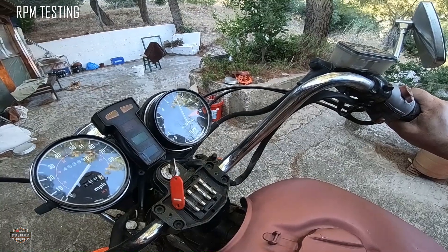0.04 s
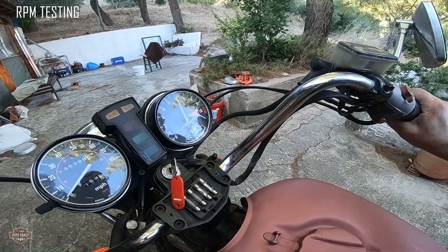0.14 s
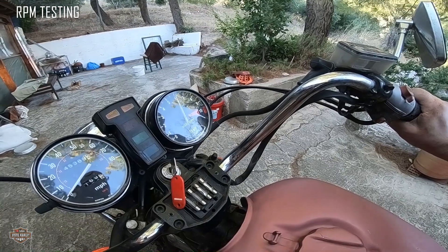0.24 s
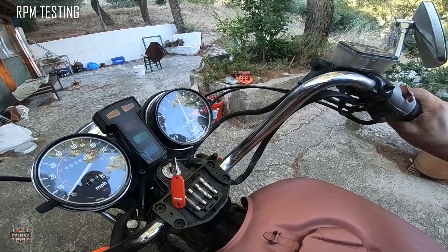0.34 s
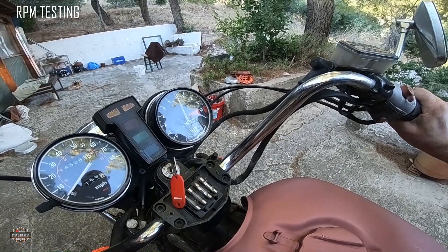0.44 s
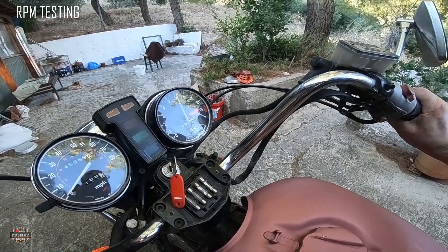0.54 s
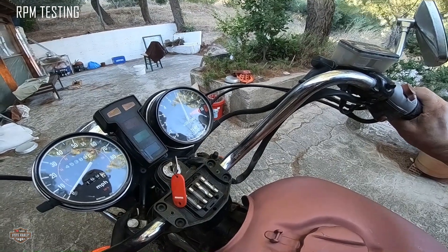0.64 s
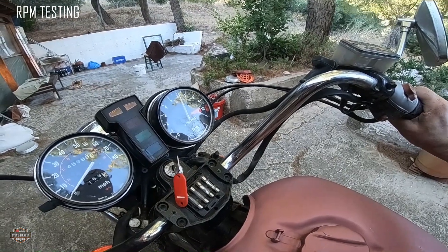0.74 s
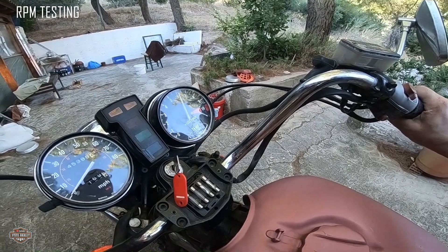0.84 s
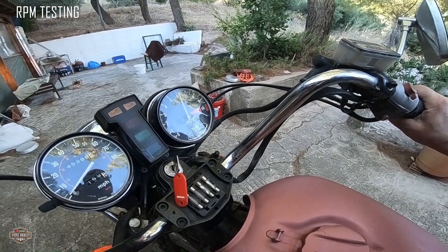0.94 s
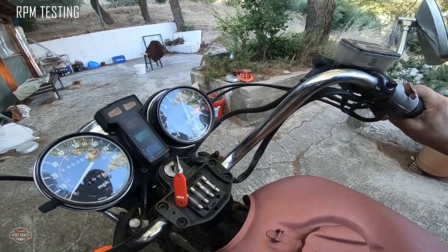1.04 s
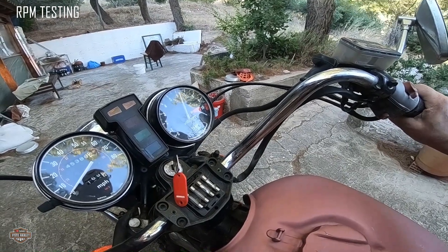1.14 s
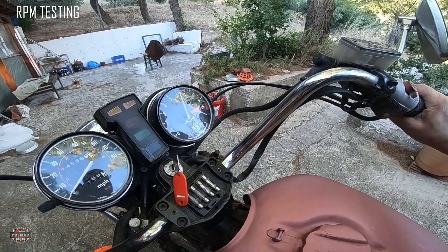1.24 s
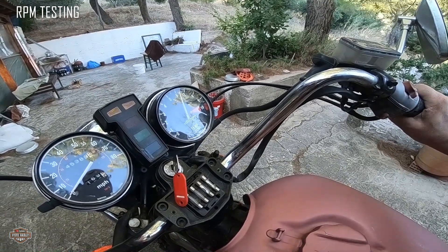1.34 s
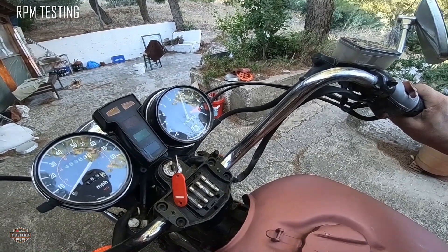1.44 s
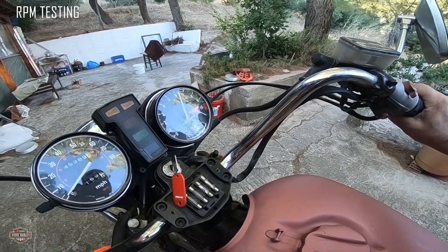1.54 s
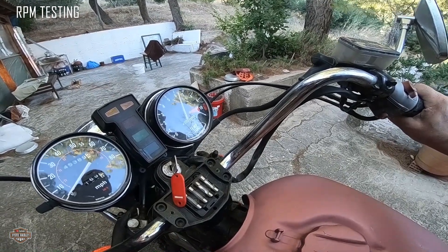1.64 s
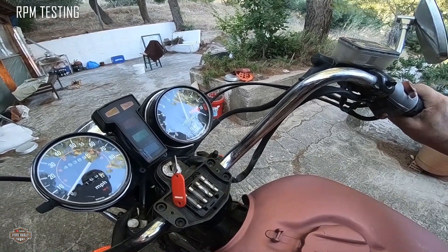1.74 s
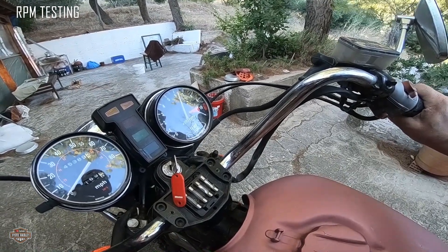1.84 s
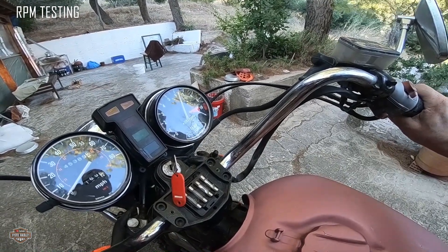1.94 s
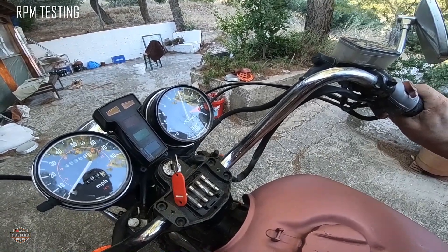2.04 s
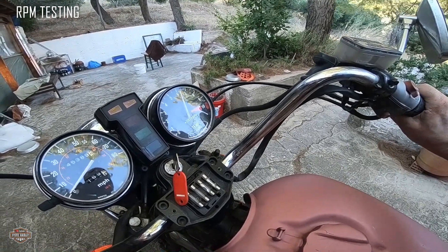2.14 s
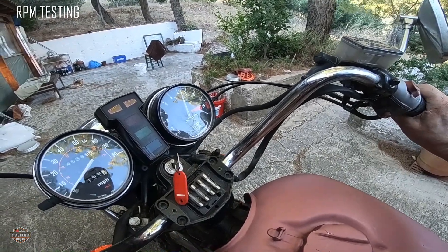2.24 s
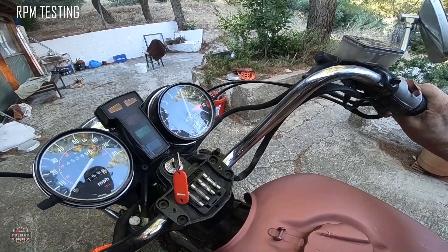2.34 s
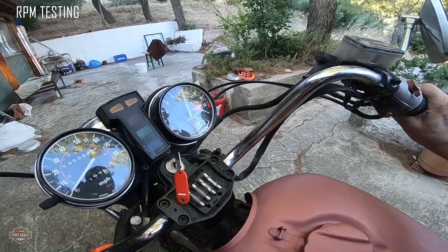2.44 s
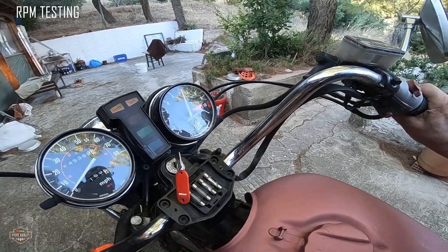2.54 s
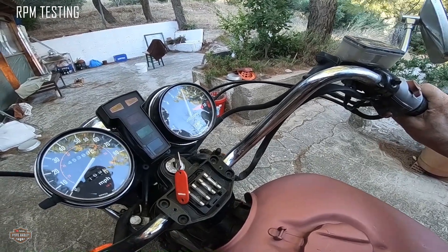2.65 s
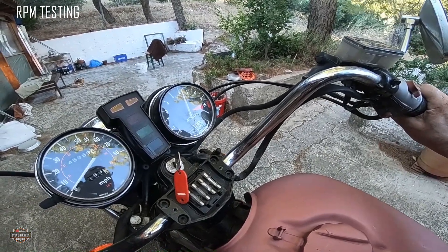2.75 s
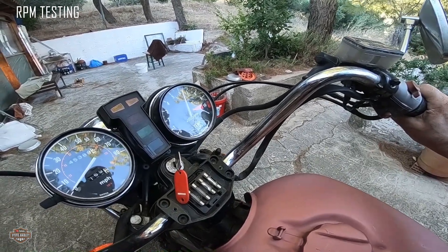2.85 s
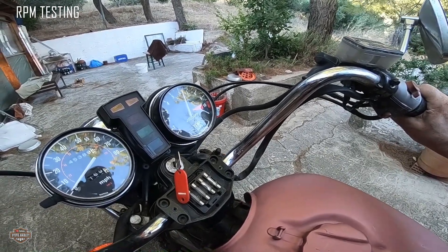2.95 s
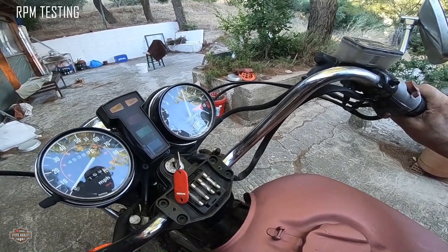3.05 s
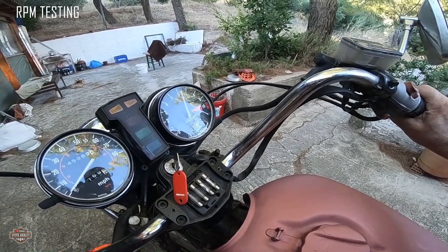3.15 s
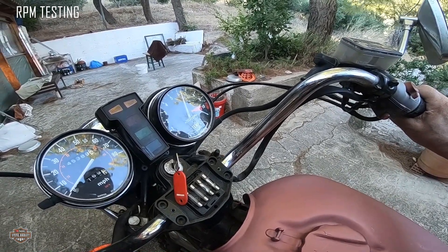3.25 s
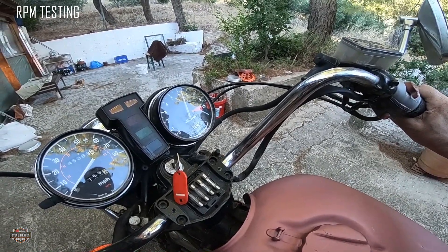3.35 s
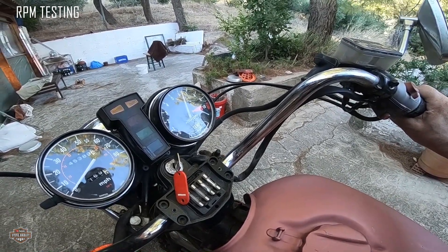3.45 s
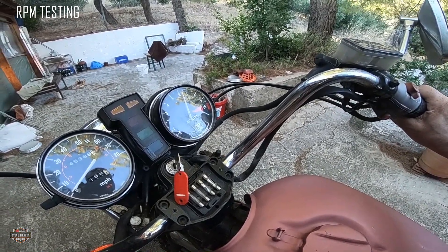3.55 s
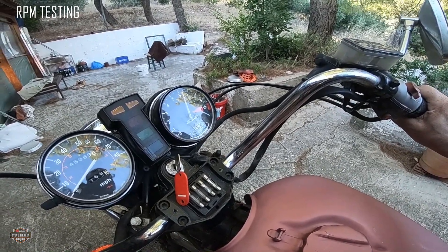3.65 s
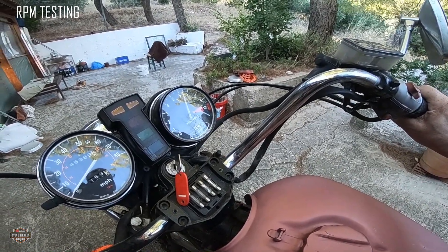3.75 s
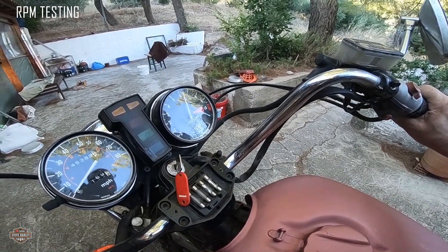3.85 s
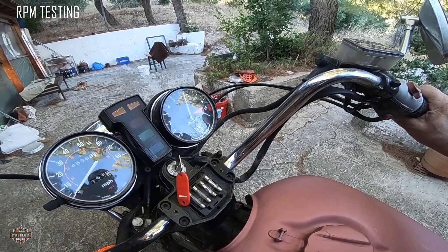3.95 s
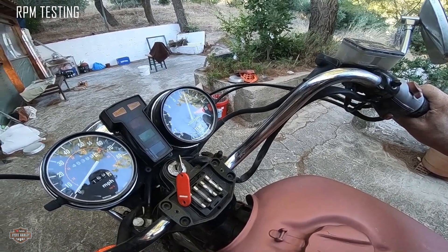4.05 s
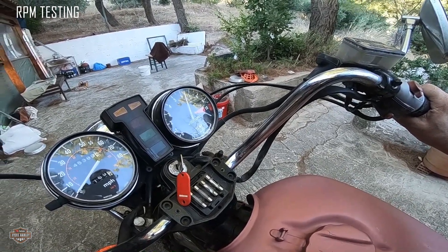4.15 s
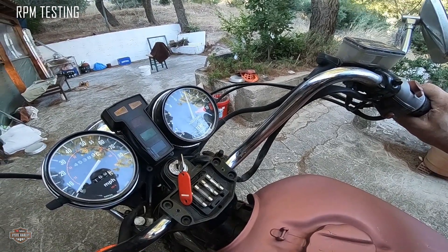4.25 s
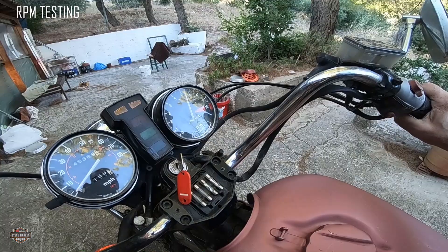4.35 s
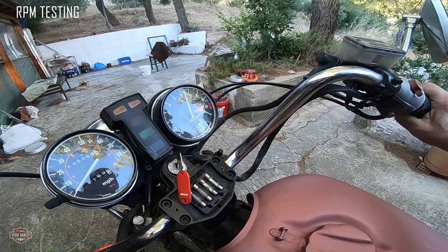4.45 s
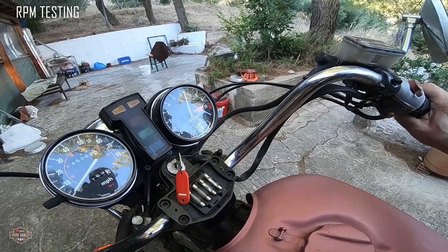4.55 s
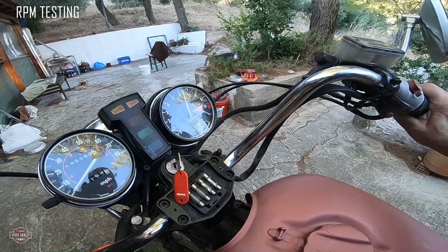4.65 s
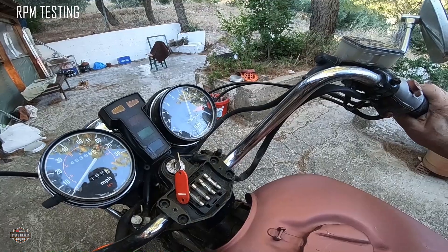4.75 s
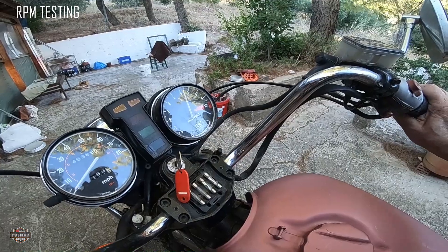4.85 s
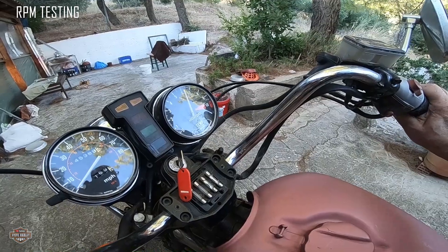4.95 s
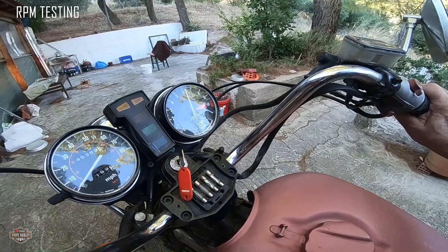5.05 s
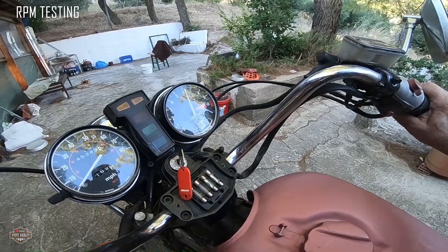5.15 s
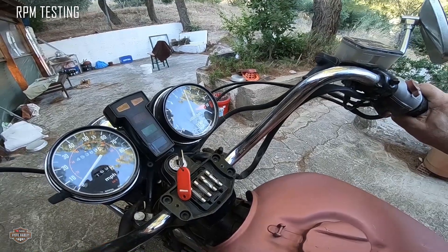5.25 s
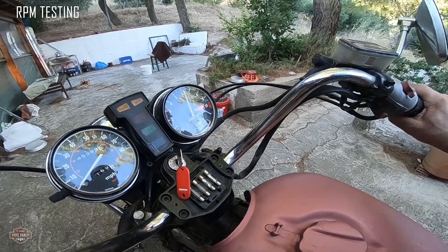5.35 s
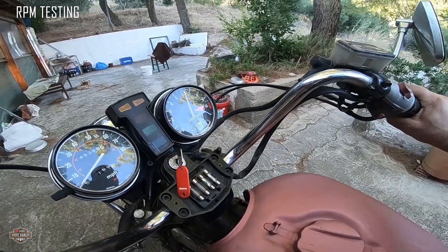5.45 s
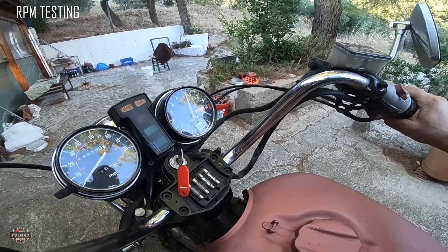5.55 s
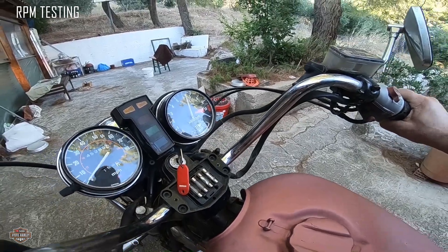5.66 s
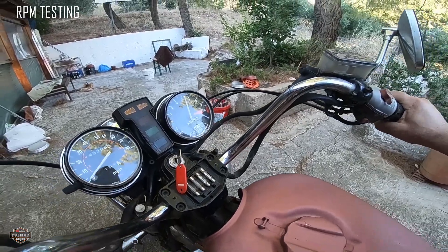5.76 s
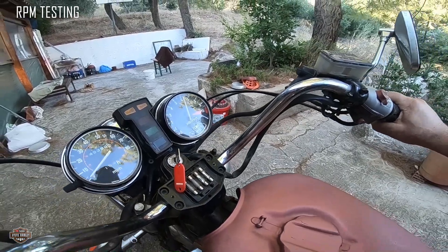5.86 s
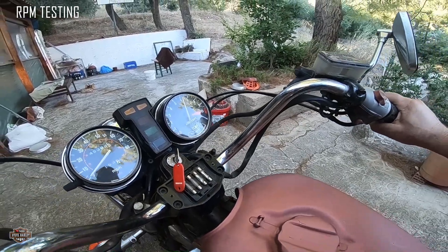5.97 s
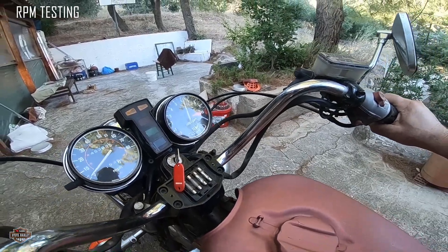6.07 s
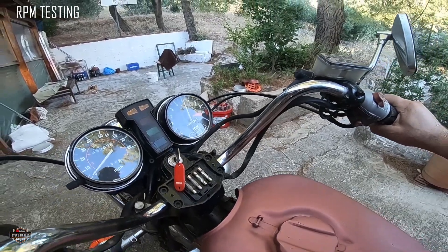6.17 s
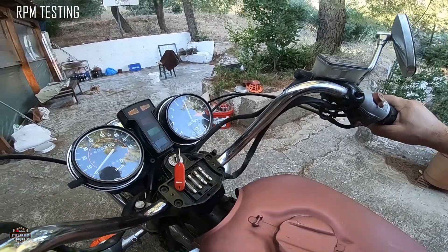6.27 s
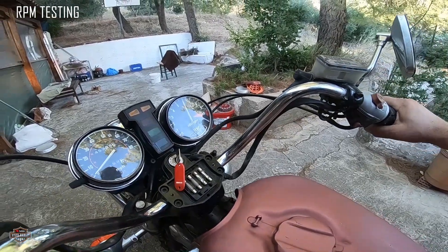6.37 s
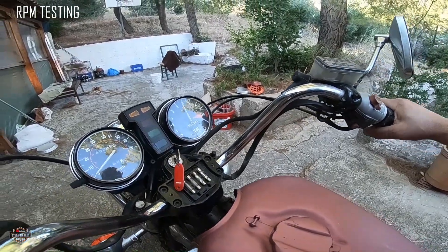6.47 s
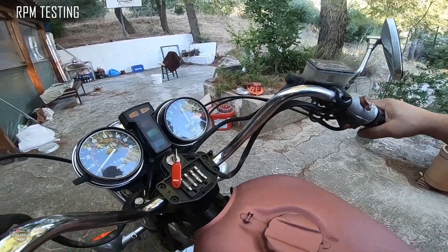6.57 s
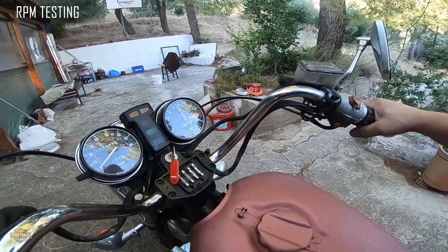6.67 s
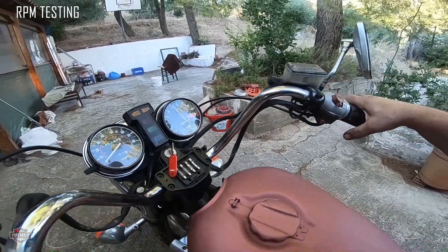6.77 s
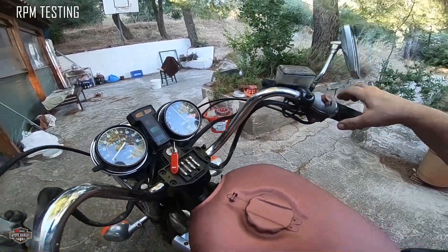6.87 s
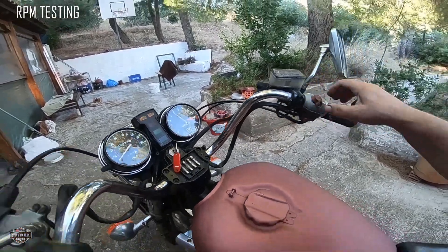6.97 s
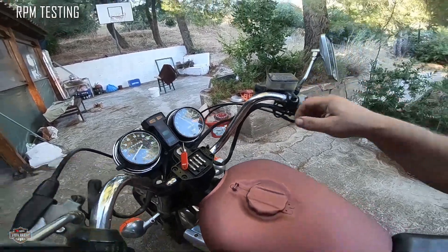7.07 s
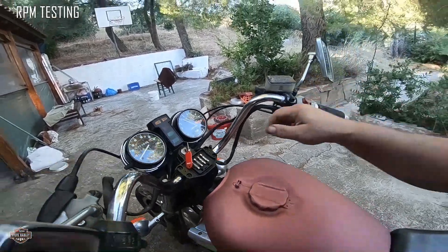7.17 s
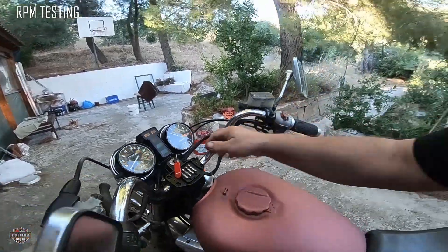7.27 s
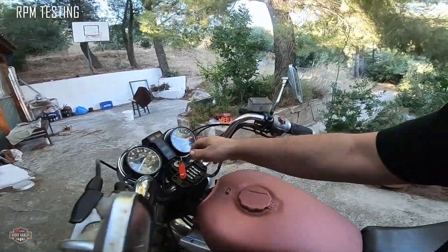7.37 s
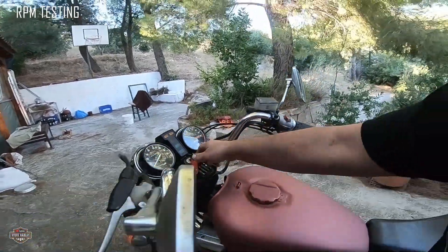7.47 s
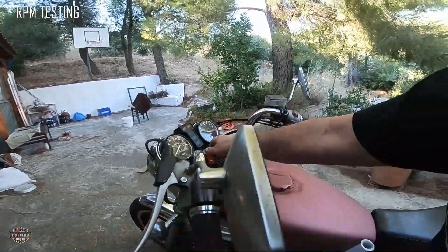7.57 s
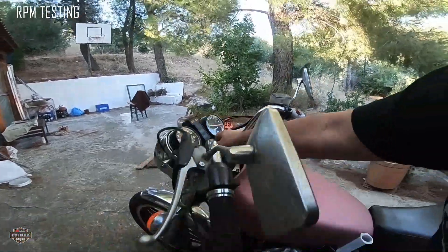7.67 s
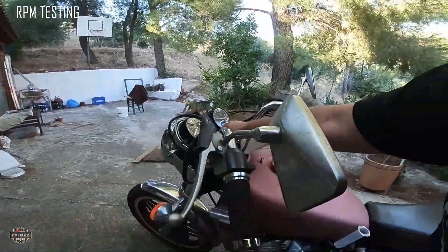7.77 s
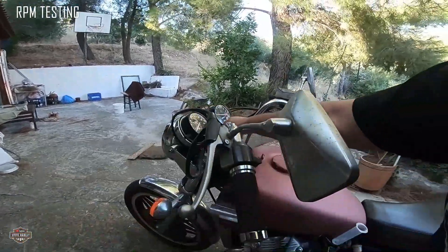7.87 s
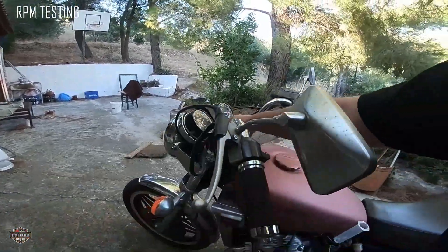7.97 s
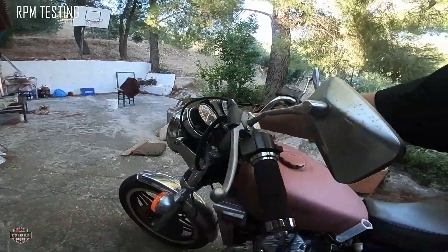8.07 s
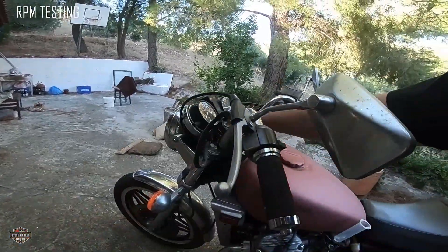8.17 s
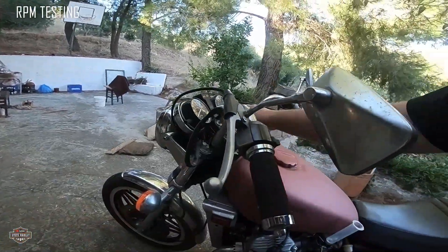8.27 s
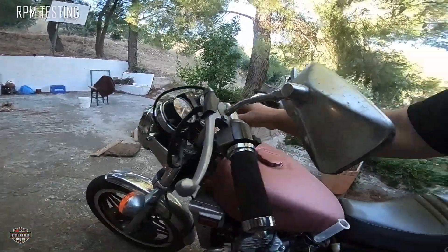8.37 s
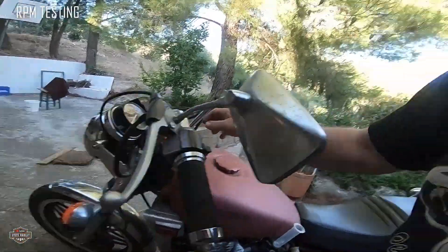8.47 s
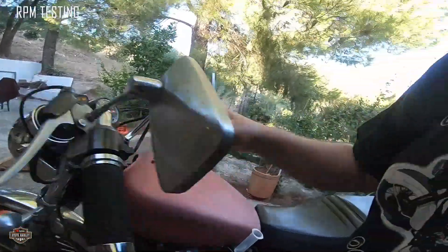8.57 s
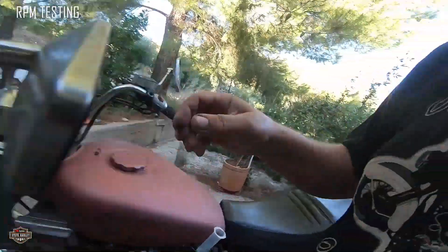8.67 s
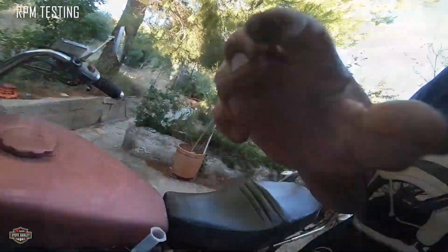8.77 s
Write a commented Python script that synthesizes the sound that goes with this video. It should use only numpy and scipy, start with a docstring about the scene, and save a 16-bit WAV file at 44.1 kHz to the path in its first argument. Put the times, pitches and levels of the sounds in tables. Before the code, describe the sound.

A parked twin-cylinder four-stroke motorcycle is heard close up from the handlebar, outdoors. From the start the engine is already at high revs, holding a steady, honking drone that wavers only slightly in pitch. Valve gear clatters and hisses underneath, and a loose fitting adds a few faint, thin, high buzzing ticks during the first five seconds. At about 5.3 seconds the throttle eases and the tone turns a little deeper and raspier. Around 6.3 seconds the throttle shuts and the revs fall, with a brief descending gear whine near 7 seconds. Low exhaust puffs come forward, slowing into a lumpy idle, joined from about 7.5 seconds by metallic knocks. At roughly 8.4 seconds the ignition is cut, and the last weak puffs and clatter fade quickly.

```python
"""Twin-cylinder motorcycle, revved and switched off

A parked four-stroke, heard from the handlebar, is held near 5800 rpm, let down to idle and stopped.
Periodic gas flow makes the intake honk on the fifth and sixth orders (harmonics) of the engine cycle;
with the throttle shut, single exhaust puffs excite the silencer's resonances. Valve gear clatters and
hisses, a loose fitting buzzes, a gear whines on the way down and slack parts knock at idle."""
import sys
import numpy as np
from scipy import signal
from scipy.fft import rfft, irfft, next_fast_len
from scipy.io import wavfile

SR = 44100
rng = np.random.default_rng(int(sys.argv[2]) if len(sys.argv) > 2 else 0)


def bounce(signal):
    """Save signal as a 16-bit WAV file at the path given by the first command-line argument."""
    frames = np.transpose(np.atleast_2d(signal))
    limited = np.clip(frames, -1, 1)
    pcm = np.round(limited * 32767).astype(np.int16)
    wavfile.write(sys.argv[1], SR, pcm)


N = 388521
T = np.arange(N) / SR
KEY_OFF_S = 8.365  # the ignition is cut

# throttle grip: (time [s], eased share [0-1], open share [0-1])
GRIP = [(5.28, 0.02, 1), (5.6, 0.81, 0.74), (6.25, 1, 0.81), (6.42, 1, 0.25), (6.7, 0.94, 0.22),
        (7.8, 1, 0.04)]
# envelope of the mechanical noise: (time [s], level [dB])
MACHINE_LEVEL = [(0.15, -36.5), (0.7, -39), (2.8, -41), (5.1, -41), (6.1, -36.5), (6.65, -40), (7.1, -35.5),
                 (7.8, -39.5)]


def engine_note(cycle, hz, cruise_hz=49.1, flutter_db=1.5, swell=0.12, fires_at=.75, smear=.15):
    """Periodic gas flow gives a harmonic series; easing the grip moves the honk down one order."""
    # spectra with the grip held and eased: (order of the cycle, relative level [dB])
    held_spectrum = [(1, -25.5), (2, -8), (3, -14), (4, -16), (5, -3.5), (6, 2.5), (7, -17.5), (8, -16),
                     (9, -19.5), (10, -16.5), (11, -41.5), (12, -20), (13, -16), (14, -34), (15, -34),
                     (16, -33), (17, -36.5), (18, -41), (19, -44.5), (20, -56), (21, -49.5), (22, -52),
                     (23, -49), (24, -44.5), (25, -38), (26, -37), (27, -40.5), (28, -50), (29, -38.5),
                     (30, -57)]
    eased_spectrum = [(1, -18), (2, -6), (3, -14), (4, -12.5), (5, 4), (6, -10), (7, -15.5), (8, -13.5),
                      (9, -15.5), (10, -13.5), (11, -26.5), (12, -14), (13, -14.5), (14, -23), (15, -21),
                      (16, -23.5), (17, -36.5), (18, -26), (19, -40.5), (20, -36.5), (21, -35.5), (22, -37),
                      (23, -29), (24, -38), (25, -41.5), (26, -37), (27, -37.5), (28, -50), (29, -34.5),
                      (30, -40)]
    # low, fifth, sixth and upper orders: (held level [dB], eased level [dB], slope with speed [dB/Hz])
    voicing = [(-19, -19.5, 0.26), (-17.5, -10.5, 1.5), (-11.7, -25, -0.36), (-24, -23.5, -0.3)]
    eased, opening = curves(GRIP)
    above_cruise = np.maximum(hz - cruise_hz, -5)  # intake tuning matters only near the held revs
    held_db, eased_db = np.array(held_spectrum)[:, 1], np.array(eased_spectrum)[:, 1]
    held_lag, eased_lag = minimum_phase(held_db), minimum_phase(eased_db)
    shake = .001 * walk(60)  # no two burns push the crank alike
    angle = 2 * np.pi * ((cycle - fires_at + shake) % 1)
    count = len(held_db)
    groups = [range(4), [4], [5], range(6, count)]  # index k is order k + 1
    note = 0
    for group, (held_level, eased_level, slope) in zip(groups, voicing):
        tone, power = 0, 0
        for k in group:
            size = undb(held_db[k]) + (undb(eased_db[k]) - undb(held_db[k])) * eased
            lag = held_lag[k] - np.pi * smear * k ** 2 / count  # higher orders linger in the pipes
            lag += np.pi / 2 * (k % 2) * (k > count // 2)  # top orders crackle once per cylinder
            lag += (eased_lag[k] - held_lag[k]) * eased
            waver = (undb(flutter_db) - 1) * walk(35) + swell * walk(3)
            flutter = 1 + (1 - size) * waver  # weak orders waver most
            tone += size * flutter * np.cos((k + 1) * angle + lag)
            power += size ** 2 / 2
        db = held_level + (eased_level - held_level) * eased + slope * above_cruise
        note += undb(db) * tone / np.sqrt(power)
    return note * opening


def exhaust_puffs(cycle, hz, boom_db=-25, header_db=-41):
    """Impulse excitation: with the throttle shut, two puffs a cycle ring the exhaust's air modes."""
    # modes of the silencer and the header pipe: (frequency [Hz], bandwidth [Hz], gain [dB])
    silencer_modes = [(51.8, 12, 3.5), (87.7, 18, -2), (112.7, 20.4, 3.5), (134.4, 27.2, 4.5),
                      (162, 21.3, -3)]
    header_modes = [(212, 23, 4.5), (263, 60, -1.5), (325, 39, 3.5), (365.5, 65, -1), (429, 48, -6.5),
                    (710, 130, -20)]
    # the cylinders puff alike until the revs sink; then the second comes late and soft
    even = speed_share(hz, slow_hz=20.4, fast_hz=25.1)
    second_at = .635 + .068 * (1 - even)
    first = strikes(cycle, scatter_db=.6)
    second = undb(-8 * (1 - even)) * strikes(cycle - second_at, scatter_db=1.2)
    puffs = (first + second) * puff_size() * undb(-.5 * even)
    wake = 0.04 * bursts(puffs, decay_s=0.025)  # turbulence behind each puff
    steepness = (hz / hz.max()) ** 0.98  # faster puffs have steeper fronts and reach higher modes
    header = ring((puffs + wake) * steepness, header_modes)
    header = signal.sosfilt(signal.butter(2, 170, "high", fs=SR, output="sos"), header)
    boom = unit(ring(puffs, silencer_modes, passes=2))
    # only the lumpy beat swings the deepest mode, and at the very end there is too little gas for it
    deep = signal.sosfiltfilt(signal.butter(3, 78, fs=SR, output="sos"), boom)
    starved = 1 - speed_share(hz, slow_hz=8.5, fast_hz=13)
    boom -= deep * (0.74 * even + .15 * starved)
    return undb(boom_db) * boom + undb(header_db) * unit(header)


def puff_size(shut_s=6.246, rise_s=0.39, cut_s=.05, unfired_db=-9):
    """Puffs grow to a limit after the throttle shuts; unfired, the pistons only pump air."""
    grown = 1 - np.exp(-np.maximum(T - shut_s, 0) / rise_s)
    unfired = np.clip((T - KEY_OFF_S) / cut_s, 0, 1)
    return grown * undb(unfired_db * unfired)


def clatter(cycle, hz, locked_share=0.2, fast_db=3, grain_db=1.5):
    """Impacts of chain and valve gear excite the casing; at speed, part of them recurs every cycle."""
    # casing response at speed and near idle: (frequency [Hz], level [dB])
    casing_fast = [(60, -6), (300, -1.5), (700, 3), (880, -1.5), (1030, -3.5), (1260, -3), (1480, -6),
                   (1620, -3.5), (1740, -1), (1950, -7), (2200, -12), (2550, -12), (3000, -23),
                   (4500, -43.5)]
    casing_slow = [(60, -16), (250, 15), (400, 5), (560, -1), (700, 2), (900, -2), (1250, -2.5),
                   (1440, -1.5), (1580, -2), (1800, -1.5), (2300, -13), (3000, -19), (4500, -46)]
    pattern = colour(rng.standard_normal(N), [(700, 0), (3000, -4), (6000, -16)])
    pattern = pattern[:int(SR / hz.max())]  # one cycle of impacts
    position = (cycle + 0.0038 * walk(60)) % 1
    locked = unit(np.interp(position, np.linspace(0, 1, len(pattern)), pattern))
    loose = unit(rng.standard_normal(N) * undb(grain_db * walk(280)))
    impacts = np.sqrt(locked_share) * locked + np.sqrt(1 - locked_share) * loose
    at_speed = undb(fast_db) * colour(valve_gate(cycle - .64) * impacts, casing_fast)
    near_idle = colour(valve_gate(cycle - .85, steady=2.6) * loose, casing_slow)
    fast = speed_share(hz)
    return machine_gain() * (np.sqrt(fast) * at_speed + np.sqrt(1 - fast) * near_idle)


def knocks(cycle, hz, first_at=.86, second_at=.4, second_db=-4, db=-16):
    """At low revs, slack in chain and clutch raps the side cover into free vibration twice a cycle."""
    # modes of the cover: (frequency [Hz], bandwidth [Hz], gain [dB])
    cover_modes = [(674, 120, -7.5), (1436, 30, 1.5), (1800, 200, -32), (5600, 1100, -28.5)]
    first = strikes(cycle - first_at, scatter_db=0.5)
    second = undb(second_db) * strikes(cycle - second_at, scatter_db=4.5)
    slack = 1 - speed_share(hz, slow_hz=16, fast_hz=23)
    raps = bursts((first + second) * slack, decay_s=.014)
    lowpass = signal.butter(2, 6500, fs=SR)  # oil softens the contact
    return undb(db + dying_db()) * signal.lfilter(*lowpass, ring(raps, cover_modes))


def throttle_rasp(cycle, opens_at=0.51, decay_cycles=0.37, db=-37.5):
    """Turbulence: gas tears through the nearly closed throttle once a cycle."""
    # flow noise: (frequency [Hz], level [dB])
    spectrum = [(500, -7.5), (850, -1), (1200, -4), (1750, 11), (2000, -10), (2300, -26.5),
                (5000, -36), (9000, -44.5)]
    eased, opening = curves(GRIP)
    gas = rng.standard_normal(N) * np.exp(-((cycle - opens_at) % 1) / decay_cycles)
    return undb(db) * eased * opening ** 2 * colour(gas, spectrum)


def gear_whine(cycle, hz, teeth_per_cycle=70, whine_db=-39, half_rate_db=-44.5):
    """Forced vibration: the tooth rate falls through a casing mode; at speed, half that rate hits it."""
    angle, tooth_hz = 2 * np.pi * teeth_per_cycle * cycle, teeth_per_cycle * hz
    meshing = speed_share(hz, slow_hz=19, fast_hz=23.8)
    meshing *= 1 - speed_share(hz, slow_hz=28.2, fast_hz=34)
    whine_gain = undb(whine_db + 1.7 * walk(60)) * casing_resonance(tooth_hz) * meshing
    whine = whine_gain * np.cos(angle + .5 * walk(70))
    half_rate_gain = undb(half_rate_db + 1.7 * walk(20)) * casing_resonance(tooth_hz / 2)
    return whine + half_rate_gain * np.cos(angle / 2 + 0.68 * walk(60))


def casing_resonance(drive_hz, mode_hz=1749, half_width_hz=51):
    """A damped mode responds most when driven at its natural frequency."""
    return 1 / np.hypot(1, (drive_hz - mode_hz) / half_width_hz)


def hiss(cycle, hz, grain_db=0.5, fast_db=-13.5, slow_db=-21.5):
    """Broadband noise of gas and sliding metal pulses with the valves, weaker and duller at low revs."""
    # spectra at speed and near idle: (frequency [Hz], level [dB])
    hiss_fast = [(1800, -27), (3000, -2), (4000, 1), (4700, -1.5), (6400, -0.5), (7300, -6), (9000, -6.5),
                 (9900, -19), (11000, -28), (12200, -12.5), (14000, -14.5), (15500, -23.5)]
    hiss_slow = [(1800, -16), (3000, -1.5), (4100, -1.5), (5200, -2.5), (6700, -2.5), (7300, -9.5),
                 (9000, -11), (11000, -31), (12200, -21), (15500, -29)]
    grains = rng.standard_normal(N) * undb(grain_db * walk(700))
    grains *= valve_gate(cycle - .64, decay_cycles=0.28, steady=2)
    at_speed = undb(fast_db) * colour(grains, hiss_fast)
    near_idle = undb(slow_db) * colour(grains, hiss_slow)
    fast = speed_share(hz)
    return machine_gain() * (fast * at_speed + (1 - fast) * near_idle)


def buzz(cycle, chance=.14, light_db=-51, db=-73):
    """Intermittent contact: a loose handlebar fitting rings thin and high while the grip is held."""
    # the hardest ticks: (time [s], relative level [dB])
    ticks = [(0.1315, -43.5), (0.174, -45), (0.43, -49), (1.9879, -48), (3.2774, -45.5), (5.121, -48)]
    # the fitting's response: (frequency [Hz], level [dB])
    spectrum = [(5000, -25), (8000, -11), (9100, 1.5), (9500, -5), (10200, -33.5)]
    eased, _ = curves(GRIP)
    taps = undb(light_db) * strikes(cycle, scatter_db=3.5) * (rng.random(N) < chance) * (1 - eased)
    for time_s, tick_db in ticks:
        taps[int(time_s * SR)] += undb(tick_db)
    return undb(db) * colour(bursts(taps, decay_s=0.0078), spectrum)


def engine_speed(coast_s=1.2405, limit_hz=3.575):
    """The cycle rate follows the rider's hand, then decays exponentially against friction."""
    # speed under the hand: (time [s], four-stroke cycle rate [Hz])
    hand_speed = [(0.0, 46.75), (0.85, 47.66), (1.09, 49.33), (1.41, 49.28), (1.76, 48.42), (2.12, 48.72),
                  (2.22, 47.78), (2.8, 48.64), (3.85, 49.18), (4.09, 48.96), (4.43, 49.65), (4.73, 48.99),
                  (4.8, 47.59), (5.09, 47.09), (5.4, 48.92), (5.68, 49.06), (6.2, 45.2), (6.57, 40.4)]
    hz, = curves(hand_speed)
    elapsed_s = np.maximum(T - hand_speed[-1][0], 0)
    return limit_hz + (hz - limit_hz) * np.exp(-elapsed_s / coast_s)


def speed_share(hz, slow_hz=30, fast_hz=45):
    """Linear crossfade: 0 at low revs, 1 at high."""
    return np.clip((hz - slow_hz) / (fast_hz - slow_hz), 0, 1)


def valve_gate(cycle, decay_cycles=0.04, steady=0.47):
    """Amplitude modulation: noise flares twice a cycle as the valves seat, over steady rubbing."""
    first = np.exp(-(cycle % 1) / decay_cycles)
    second = 0.54 * np.exp(-((cycle - 0.36) % 1) / decay_cycles)
    return steady + first + second


def machine_gain():
    """Amplitude envelope shared by clatter and hiss."""
    db, = curves(MACHINE_LEVEL)
    return undb(db + dying_db())


def dying_db(db_per_s=23.5):
    """Exponential decay of the machinery once the ignition is cut."""
    return -db_per_s * np.maximum(T - KEY_OFF_S, 0)


def strikes(turns, scatter_db):
    """Impulse train: one blow of random size at each whole turn."""
    at = np.flatnonzero(np.diff(np.floor(turns)) > 0)
    x = np.zeros(N)
    x[at] = undb(scatter_db * rng.standard_normal(len(at)))
    return x


def bursts(impulses, decay_s):
    """Noise that starts at each impulse and decays exponentially."""
    envelope = signal.lfilter([1], [1, -np.exp(-1 / (decay_s * SR))], impulses)
    return envelope * rng.standard_normal(N)


def ring(x, modes, passes=1):
    """Superposed modes of alternating sign; with two passes, a blow swells before it fades."""
    out = 0
    for k, (hz, width, db) in enumerate(modes):
        section = np.concatenate(signal.iirpeak(hz, hz / width, fs=SR))
        out += (-1) ** k * undb(db) * signal.sosfilt([section] * passes, x + 1e-18)
    return out


def colour(x, spectrum):
    """Spectral shaping by (frequency [Hz], level [dB]) points, scaled to rms 1."""
    hz, db = np.transpose(spectrum)
    size = next_fast_len(N)
    f = np.maximum(np.fft.rfftfreq(size, 1 / SR), 1)
    gain = undb(np.interp(np.log(f), np.log(hz), db))
    gain *= np.minimum(f / hz[0], 1) ** 2  # roll-off below the first point
    return unit(irfft(rfft(x, size) * gain, size)[:N])


def minimum_phase(db):
    """Causality sets each order's phase: a blow, followed by its ring."""
    cepstrum = irfft(np.r_[db[0], db, db[-1]] * np.log(10) / 20)
    half = len(cepstrum) // 2
    return 2 * rfft(cepstrum[:half], 2 * half).imag[1:-1]


def walk(rate_hz):
    """Random fluctuation: straight ramps between values with a spread near 1."""
    step = max(int(SR / rate_hz), 2)
    levels = 0.94 * rng.standard_normal(N // step + 2)
    ramps = levels[:-1, None] + np.diff(levels)[:, None] * (np.arange(step) / step)
    return ramps.ravel()[:N]


def curves(table):
    """The columns of a timed table, interpolated to every sample."""
    times, *columns = np.transpose(table)
    return [np.interp(T, times, column) for column in columns]


def undb(db):
    """Decibels to amplitude ratio."""
    return 10 ** (np.asarray(db) / 20)


def unit(x):
    """Scale to rms 1."""
    return x / np.sqrt(np.mean(x ** 2))


def scene(strong_puff_s=8.187, hunt_cycles=.009):
    """Superposition of gas and metal sources, all phase-locked to the engine cycle."""
    hz = engine_speed()
    cycle = np.cumsum(hz) / SR
    cycle -= np.interp(strong_puff_s, T, cycle)  # whole cycles fall on the strong puffs
    cycle += hunt_cycles * walk(7)  # slow hunting of the crank
    gas = engine_note(cycle, hz) + throttle_rasp(cycle) + exhaust_puffs(cycle, hz) + hiss(cycle, hz)
    metal = clatter(cycle, hz) + gear_whine(cycle, hz) + knocks(cycle, hz) + buzz(cycle)
    return (gas + metal)[None]


def record(dry, fade_s=.004, top_hz=15700):
    """Band limiting: after a brief fade-in, a steep low-pass removes the highest treble."""
    fade_in = np.minimum(T / fade_s, 1)
    return signal.sosfilt(signal.ellip(8, .2, 70, top_hz, fs=SR, output="sos"), dry * fade_in)


dry = scene()
out = record(dry)
bounce(out)
```